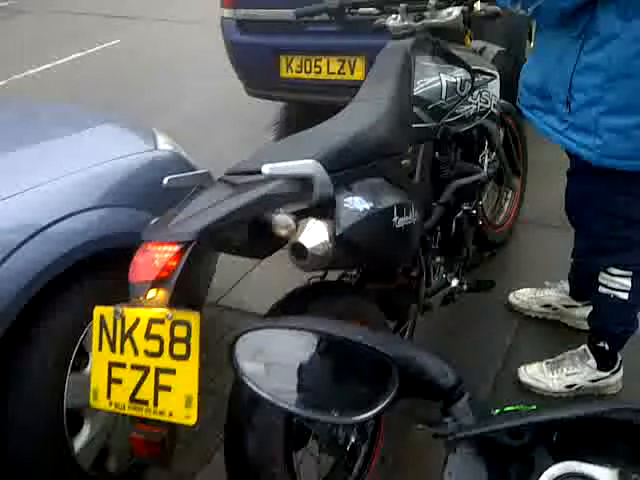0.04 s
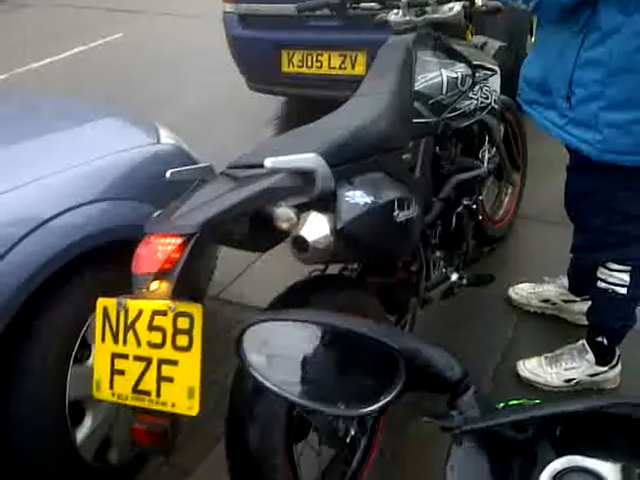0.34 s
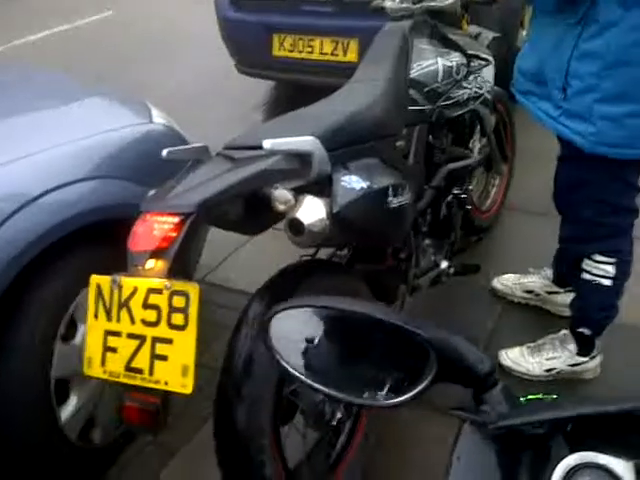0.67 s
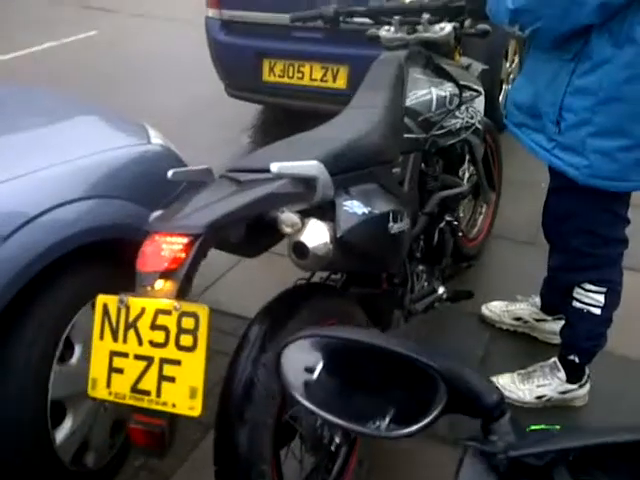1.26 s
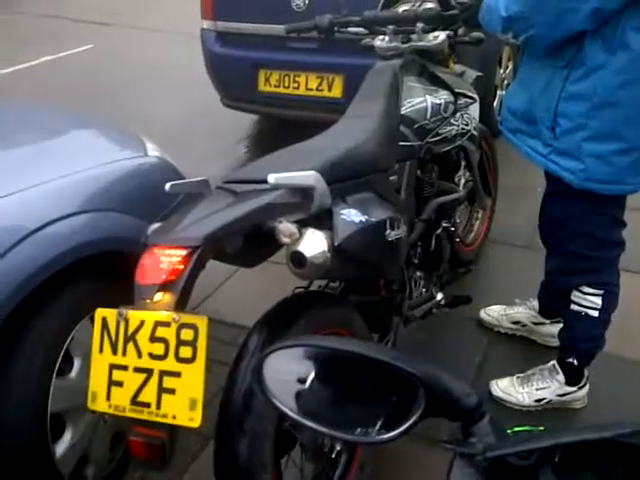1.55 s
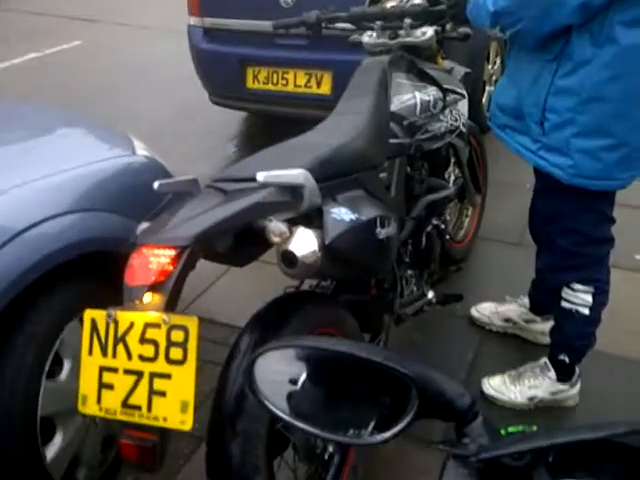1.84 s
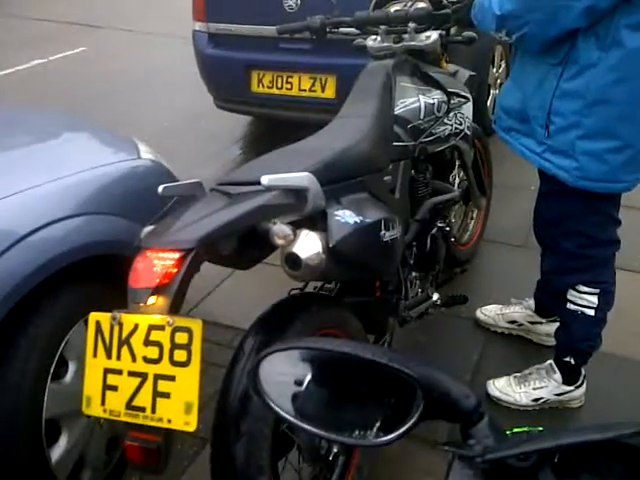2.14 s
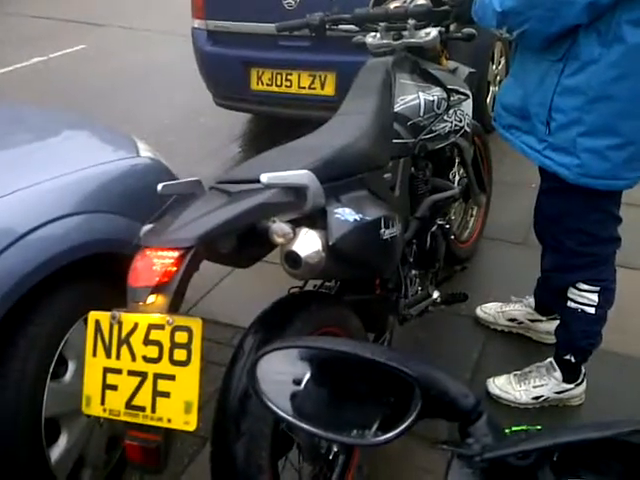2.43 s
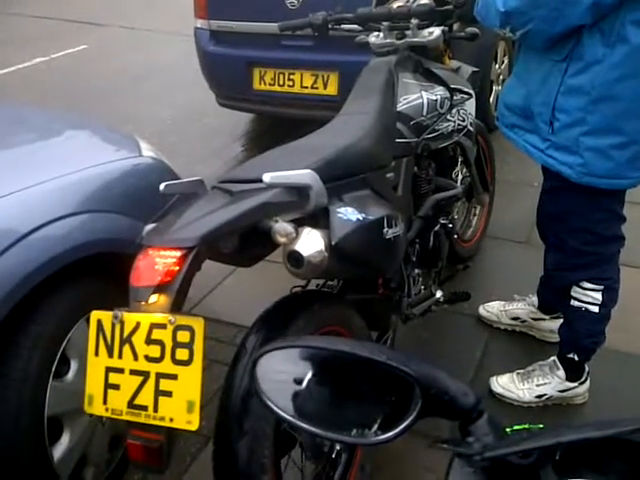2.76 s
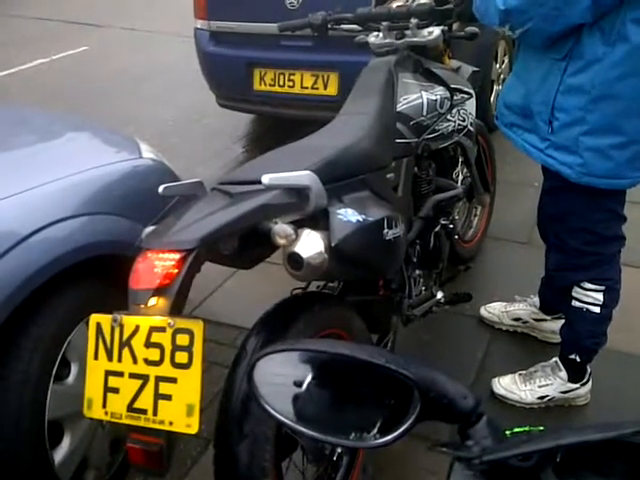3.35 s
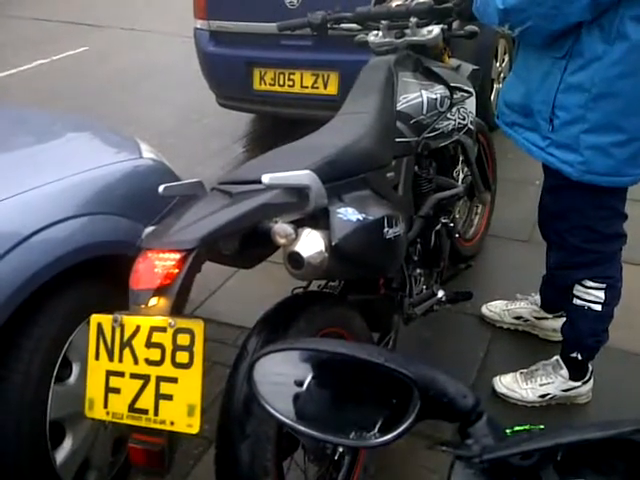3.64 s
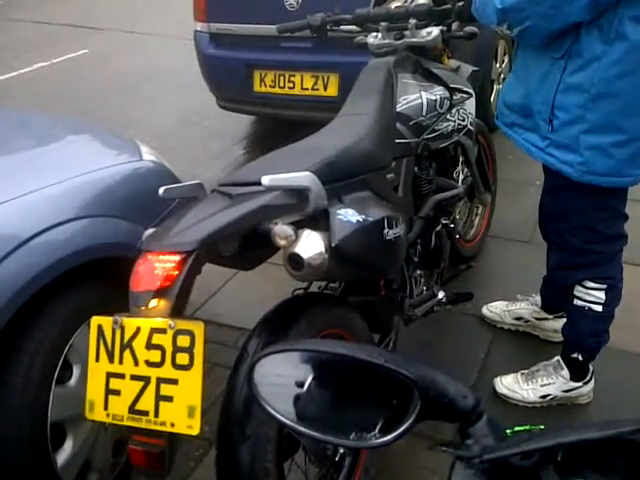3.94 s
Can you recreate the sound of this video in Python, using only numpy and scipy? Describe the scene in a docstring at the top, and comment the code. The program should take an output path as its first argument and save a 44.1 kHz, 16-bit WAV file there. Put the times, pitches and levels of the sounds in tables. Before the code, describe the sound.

Close behind the exhaust pipe on a street, a motorcycle runs at raised revs, slows with a hollow throb, then climbs again with rasp and whine. It dips briefly and picks up, valves and chain clattering throughout.

```python
"""A single-cylinder motorcycle stands in a street, heard from just behind its silencer.
It cuts in with a thump, throttle open: periodic gas puffs excite the pipe's resonances and it barks.
At 0.6 s the throttle shuts, the revs sink and the pipe booms hollow. From 2 s it opens and the revs climb,
bringing up intake roar, casing rasp and gear whine. It shuts at 3.3 s, reopens at 3.6 s and shuts for an
instant near the end. Throughout, valves and chain clatter, and nearby cars and paving answer faintly."""
import sys
import numpy as np
from scipy import signal
from scipy.fft import rfft, irfft
from scipy.io import wavfile
from scipy.ndimage import map_coordinates

SR = 44100
rng = np.random.default_rng(int(sys.argv[2]) if len(sys.argv) > 2 else 0)


def to_wav(sig):
    """Store sig (one row per channel, or 1-D mono) as 16-bit WAV at the path in sys.argv[1].

    Samples outside -1..1 are clipped; the rate is SR.
    """
    pcm = np.clip(np.atleast_2d(sig), -1, 1) * 32767
    pcm = np.round(pcm).astype(np.int16)
    wavfile.write(sys.argv[1], SR, pcm.T)  # frames by channels


N = 176400

# Engine speed: time_s, firing_hz
FIRING_RATE = [(0.2, 72), (0.56, 75.43), (0.63, 73.31), (0.74, 69.98), (1.0, 63.06), (1.26, 56.8),
               (1.6, 49.8), (1.97, 41.1), (2.04, 43.7), (2.25, 53.7), (2.47, 61), (2.75, 67.7),
               (3.03, 76.68), (3.26, 82.5), (3.36, 78.9), (3.62, 75), (3.93, 81.4), (4.0, 77.5)]
# Throttle changes: start_s, position ("open" or "shut")
THROTTLE = [(.1968, "open"), (.567, "shut"), (1.9765, "open"), (3.281, "shut"), (3.625, "open"),
            (3.96, "shut"), (3.983, "open")]

# Spectrum of the street's rumble: frequency_hz, level_db
RUMBLE_SPECTRUM = [(15, -8.5), (35, -3), (60, 3), (110, 3.5), (300, -7), (2000, -47)]

# Loudness of valves and chain: time_s, level_db
CLATTER_LEVEL = [(0.22, -34.5), (0.67, -36.5), (0.7, -34), (1.02, -43), (1.77, -41), (1.81, -38.5),
                 (1.9, -49), (2.09, -40.5), (2.32, -42), (2.39, -39), (2.56, -42.5), (2.9, -34.5),
                 (3.07, -37), (3.15, -32), (3.46, -38), (3.77, -37), (3.85, -33), (4.0, -34)]
# Spectrum of valves and chain: frequency_hz, level_db
METAL_SPECTRUM = [(1000, -30.5), (2300, -8.5), (2600, -10.5), (2770, -4.5), (3000, -13.5), (3600, -8.5),
                  (4400, -2), (4850, 0), (5120, 3), (5400, -3), (5750, -6), (6200, -7.5), (6850, -6.5),
                  (7450, -7.5), (7900, -18), (8500, -23), (9000, -41.5)]
# Valve impacts: cycle_fraction, level_db
VALVE_TICKS = [(0.152, -2.5), (0.419, -1), (.66, -1.5), (0.921, -2)]

# Partials of the gear whine: crank_multiple, level_db
WHINE_PARTIALS = [(6, 0.5), (7, -3.5), (8, -3), (9, -1.5), (10, -2.5), (11, -4.5), (12, -11), (13, -10.5)]
# Loudness of the casing's rasp: time_s, level_db
RASP_LEVEL = [(0.22, -29.5), (0.78, -29.5), (1.03, -34.5), (1.31, -30.5), (1.96, -36.5), (2.01, -35.5),
              (2.73, -29.5), (3.3, -25), (3.33, -28), (3.68, -31.5), (3.84, -24.5), (3.98, -25)]
# Resonances of the casing: frequency_hz, gain_db
CASING_RESPONSE = [(300, -47.5), (700, -15), (950, 2), (1040, -9), (1140, 1), (1210, -1.5), (1280, 1),
                   (1380, -0.5), (1500, 1), (1680, 3), (1850, -3.5), (2050, -4.5), (2450, -18.5),
                   (2780, -20), (3100, -19.5), (5000, -32), (9000, -75.5)]
# Blows on the casing: cycle_fraction, level_db
CASING_KNOCKS = [(.1, 2), (0.381, -1), (0.628, 1.5), (0.852, -9.5)]

# Resonances of the intake: frequency_hz, gain_db
INTAKE_RESPONSE = [(150, -42.5), (400, -16), (560, -5), (650, 0.5), (730, -6.5), (820, 7.5), (890, -5.5),
                   (950, 2), (1040, -16), (1140, -6), (1300, -16), (2500, -44), (6000, -72.5)]

# Loudness of the pipe's low band: time_s, level_db
BOOM_LEVEL = [(0.22, -23), (0.55, -25.5), (0.58, -16.5), (0.65, -15), (0.71, -15), (1.22, -17.5),
              (1.95, -28), (1.98, -19), (2.03, -20), (2.37, -20), (2.86, -22.5), (2.89, -23), (3.25, -23),
              (3.29, -15.5), (3.6, -18), (3.63, -23.5), (3.71, -25.5), (3.95, -22), (3.97, -14.5),
              (4.0, -26)]
# Loudness of the pipe's high band: time_s, level_db
BARK_LEVEL = [(0.22, -25.5), (0.41, -23), (1.18, -27), (1.29, -26), (1.48, -34), (1.96, -37), (1.97, -31.5),
              (2.6, -24.5), (2.63, -27.5), (3.09, -22.5), (3.16, -21), (3.17, -23), (3.59, -23.5),
              (4.0, -22.5)]
# Spectrum of the rushing gas: frequency_hz, level_db
GAS_SPECTRUM = [(30, -34.5), (150, -16.5), (280, 3), (390, -3.5), (450, -3), (520, -6.5), (635, 0),
                (720, -8), (810, -1.5), (1000, -11.5), (1700, -15), (2600, -27), (8000, -54.5)]
# Pipe resonances, pulling from low revs: frequency_hz, gain_db
PIPE_PULLING = [(25, -46), (50, -30), (95, -19.5), (118, -21.5), (132, -33), (150, -18.5), (180, -17.5),
                (230, -4), (280, 1), (330, -4.5), (385, -11.5), (440, -16.5), (505, -24), (570, -17),
                (630, -6), (715, -22.5), (790, -12.5), (950, -30.5), (1600, -27.5), (2600, -48.5),
                (6000, -77)]
# Pipe resonances, running free at high revs: frequency_hz, gain_db
PIPE_RUNNING = [(25, -40), (55, -30.5), (78, -13), (128, -26.5), (142, -17), (157, -4.5), (185, -13),
                (240, -1), (310, -2), (385, -8), (445, 3.5), (505, -9), (570, -8), (635, -1), (715, -10.5),
                (795, -11.5), (900, -16.5), (1100, -33.5), (1600, -31), (2600, -54), (6000, -75.5)]
# Pipe resonances, throttle shut: frequency_hz, gain_db
PIPE_COASTING = [(25, -46), (72, -42), (90, -14.5), (125, -12), (155, -11.5), (174, -16.5), (215, -7),
                 (295, 0.5), (335, -4.5), (395, -17.5), (460, -11), (560, -19), (640, -6.5), (720, -22),
                 (800, -17), (1000, -33.5), (1600, -37), (2600, -58), (6000, -71)]

PULL_HZ, RUN_HZ = 54.7, 66.7  # firing rates between which pulling turns into running free
FFT_SIZE, LEAD_SAMPLES = 4096, 512
TIME = np.arange(N) / SR
HZ = np.fft.rfftfreq(FFT_SIZE, 1 / SR)


def amp(db):
    """Amplitude grows tenfold for every 20 dB."""
    return 10 ** (np.asarray(db) / 20)


def unit_rms(x):
    """Normalisation to a mean power of 1."""
    return x / np.sqrt(np.mean(x ** 2) + 1e-20)


def curve(rows):
    """Linear interpolation of a time table, one value per sample."""
    return np.interp(TIME, *np.transpose(rows))


def filtered(x, response):
    """Convolution of x with a linear system whose response is given on the HZ grid."""
    impulse_response = np.roll(irfft(response), LEAD_SAMPLES)
    return signal.oaconvolve(x, impulse_response)[LEAD_SAMPLES:][:N]


def resonator(spectrum):
    """Minimum phase: folding the cepstrum gives a causal response of the given magnitude."""
    hz, db = np.transpose(spectrum)
    magnitude = amp(np.interp(np.log(HZ + 1), np.log(hz), db))
    cepstrum = irfft(np.log(magnitude), FFT_SIZE)
    cepstrum[1:FFT_SIZE // 2] *= 2
    cepstrum[FFT_SIZE // 2 + 1:] = 0
    return np.exp(rfft(cepstrum))


def diffuse_ring(decay_s):
    """Dense echoes merge into exponentially decaying noise; its frequency response, at energy 1."""
    tail = rng.standard_normal(FFT_SIZE) * np.exp(-TIME[:FFT_SIZE] / decay_s)
    return rfft(tail / np.linalg.norm(tail))


def noise(spectrum, envelope=1):
    """Source and filter: white noise is modulated, then coloured, at rms 1."""
    return unit_rms(filtered(envelope * rng.standard_normal(N), resonator(spectrum)))


def wobble(rate_hz=8):
    """Slow random modulation: a spline through random knots."""
    coarse = TIME[::SR // 200]
    knots = rng.standard_normal(int(N * rate_hz / SR) + 4)
    return np.interp(TIME, coarse, map_coordinates(knots, [coarse * rate_hz]))


def cycle_times(position=None, fraction=0):
    """Phase is the integral of rate: times at a fraction of each cycle, for one throttle position or all."""
    phase = np.cumsum(curve(FIRING_RATE)) / SR
    starts = np.interp([start_s for start_s, _ in THROTTLE], TIME, phase)
    ends = np.append(starts[1:] - .5, phase[-1])
    spans = [np.arange(start, end) for start, end, (_, held) in zip(starts, ends, THROTTLE)
             if position in (None, held)]
    counts = np.concatenate(spans) + fraction
    return np.interp(counts[counts < phase[-1]], phase, TIME)


def pulses(times, db=0, jitter_s=.00005, spread_db=.55):
    """Uneven impulses; dividing by the root of the firing rate keeps mean power independent of revs."""
    timing, strength = rng.standard_normal((len(times), 2)).T
    at = np.clip((times + jitter_s * timing) * SR, 0, N - 2)
    sample, between = at.astype(int), at % 1
    size = amp(db + spread_db * strength) / np.sqrt(curve(FIRING_RATE)[sample])
    return np.bincount(sample, size * (1 - between), N) + np.bincount(sample + 1, size * between, N)


def fading(train, decay_s):
    """Leaky integration: an envelope jumps at each impulse and decays exponentially."""
    return signal.lfilter([1], [1, -np.exp(-1 / (SR * decay_s))], train)


def street(engine, t60_s=.18):
    """Scattering from paving and parked cars adds a short reverberation, over a low rumble."""
    echoes = filtered(engine, diffuse_ring(t60_s / np.log(1000)))
    return amp(-11.5) * echoes + amp(-52) * noise(RUMBLE_SPECTRUM)


def valves_and_chain():
    """Valve impacts give bright, damped noise bursts over the even hiss of the cam chain."""
    impacts = sum(pulses(cycle_times(fraction=fraction), db, jitter_s=.00046, spread_db=3.5)
                  for fraction, db in VALVE_TICKS)
    ticks = amp(-5) * noise(METAL_SPECTRUM, fading(impacts, decay_s=.0031))
    hiss = amp(-2.5) * noise(METAL_SPECTRUM)
    return amp(curve(CLATTER_LEVEL)) * (ticks + hiss)


def gears(db_per_hz=.16):
    """Meshing teeth whine at wavering harmonics of the crank speed, strongest at high revs."""
    firing_hz = curve(FIRING_RATE)
    crank_turns = 2 * np.cumsum(firing_hz) / SR  # two turns to a firing
    whine = np.zeros(N)
    for multiple, db in WHINE_PARTIALS:
        gain = amp(db + 3 * wobble())
        phase = 2 * np.pi * (multiple * crank_turns + rng.random()) + .5 * wobble()
        whine += gain * np.sin(phase)
    level_db = curve(RASP_LEVEL) - 2.2 + db_per_hz * (firing_hz - firing_hz.max())
    return amp(level_db) * unit_rms(whine)


def casing():
    """Impact excitation: blows tied to the crank ring the casing, and rough noise follows each firing."""
    blows = sum(pulses(cycle_times(fraction=fraction), db, spread_db=2) for fraction, db in CASING_KNOCKS)
    smear = np.exp(1j * np.angle(diffuse_ring(decay_s=.0014)))  # spreads each blow in time
    ring = unit_rms(filtered(blows, resonator(CASING_RESPONSE) * smear))
    firings = pulses(cycle_times(), spread_db=2)
    envelope = fading(firings, decay_s=.016) / np.sqrt(curve(FIRING_RATE))
    rasp = noise(CASING_RESPONSE, envelope)
    return amp(curve(RASP_LEVEL)) * (amp(-7) * ring + amp(-5) * rasp)


def intake(db_per_hz=2.3):
    """One gulp a cycle, between the exhaust puffs, drives the intake's resonances: a roar at high revs."""
    firing_hz = curve(FIRING_RATE)
    gulps = pulses(cycle_times(fraction=.419))
    roar = unit_rms(filtered(gulps, resonator(INTAKE_RESPONSE)))
    return amp(curve(BARK_LEVEL) + db_per_hz * (firing_hz - firing_hz.max())) * roar


def rushing_gas(puffs, rise_s=.0025, ragged_db_per_hz=.12):
    """Turbulence: a noise burst at each puff, more ragged as the revs sink, over a steady flow."""
    envelope = fading(fading(puffs, decay_s=.0092), rise_s)
    burst_db = -7.5 + ragged_db_per_hz * (RUN_HZ - curve(FIRING_RATE))
    bursts = amp(burst_db) * noise(GAS_SPECTRUM, envelope)
    flow = amp(-10) * noise(GAS_SPECTRUM)
    return amp(curve(BARK_LEVEL)) * (bursts + flow)


def exhaust(crossover_hz=392):
    """Forced resonance: one puff a cycle rings the pipe with a low boom and a higher bark, as gas rushes."""
    firing_hz = curve(FIRING_RATE)
    fired = pulses(cycle_times("open"))
    coasted = pulses(cycle_times("shut"))
    backflow = pulses(cycle_times("shut", fraction=.626), db=-10, jitter_s=.0005)
    coasted += backflow * (firing_hz < PULL_HZ)  # a weak second puff at low revs
    sound = rushing_gas(fired + coasted)
    free = np.clip((firing_hz - PULL_HZ) / (RUN_HZ - PULL_HZ), 0, 1)
    drives = [(fired * (1 - free), PIPE_PULLING), (fired * free, PIPE_RUNNING), (coasted, PIPE_COASTING)]
    lowpass = 1 / (1 + (HZ / crossover_hz) ** 10)
    bands = [(lowpass, curve(BOOM_LEVEL) - .92), (1 - lowpass, curve(BARK_LEVEL) - .5)]
    for puffs, spectrum in drives:
        pipe = resonator(spectrum)
        for band, level_db in bands:
            response = unit_rms(abs(pipe * band)) * np.exp(1j * np.angle(pipe))
            sound -= np.sqrt(SR) * amp(level_db) * filtered(puffs, response)
    return sound


def scene():
    """Superposition: the engine's sources and the street add in one channel."""
    engine = exhaust() + intake() + casing() + gears() + valves_and_chain()
    return (engine + street(engine))[None]


def record(dry, start_s=.193, fade_s=.005, thump_db=9.5, thump_s=.0058, top_hz=8800):
    """Gating and band limiting: the level overshoots as the sound cuts in; a low-pass cuts the top treble."""
    elapsed = np.maximum(TIME - start_s, 0)
    fade_in = np.minimum(elapsed / fade_s, 1)
    thump = amp(thump_db * np.exp(-elapsed / thump_s))
    lowpass = signal.ellip(12, .1, 90, top_hz, fs=SR, output="sos")
    return signal.sosfilt(lowpass, dry * fade_in * thump)


dry = scene()
out = record(dry)
to_wav(out)
```